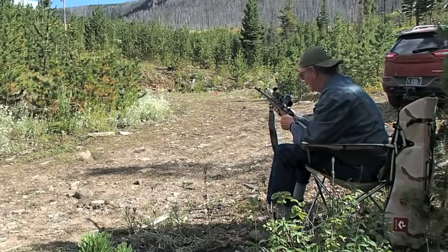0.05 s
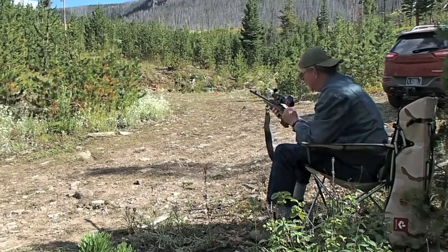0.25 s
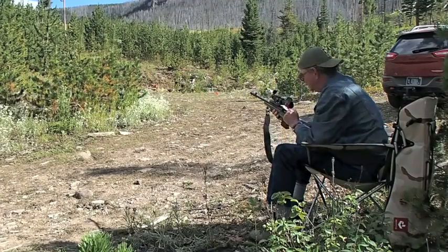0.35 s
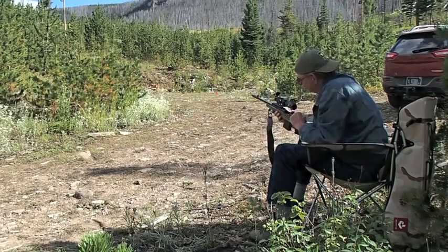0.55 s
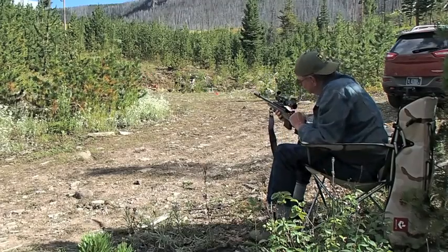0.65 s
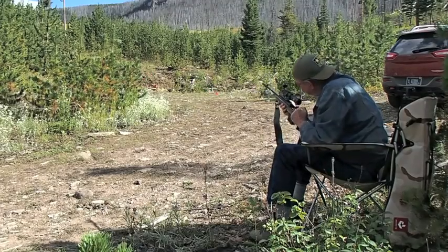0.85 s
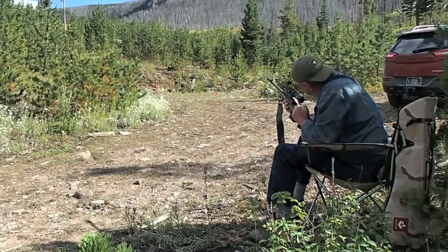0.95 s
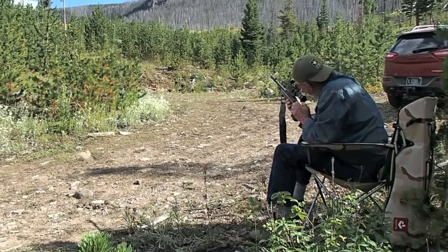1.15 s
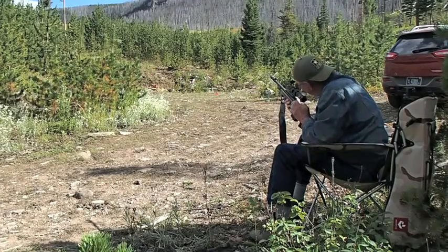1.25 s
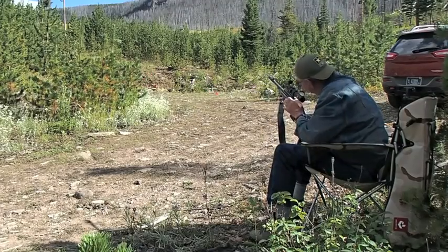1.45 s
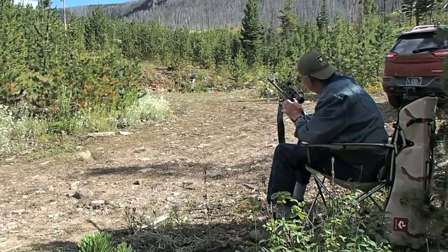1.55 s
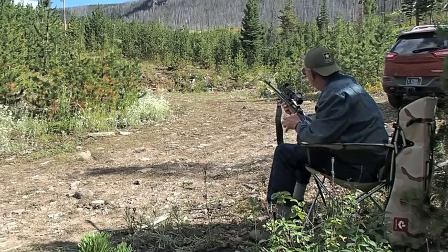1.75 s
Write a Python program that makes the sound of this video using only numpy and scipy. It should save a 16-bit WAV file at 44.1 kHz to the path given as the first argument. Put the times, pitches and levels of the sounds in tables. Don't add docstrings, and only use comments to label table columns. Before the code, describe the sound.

A rifle bolt is lifted and snapped back with hard steel clacks, the spent case rings and ticks on soil, then the bolt is pushed home and locked, a few metres from the microphone outdoors.

```python
import sys
import numpy as np
from scipy import signal
from scipy.io import wavfile
from scipy.ndimage import uniform_filter1d

SR = 44100
rng = np.random.default_rng(int(sys.argv[2]) if len(sys.argv) > 2 else 0)


def elevation(decibels):
    levels = np.asarray(decibels, float)
    return 10 ** (levels / 20)


def generate_wav(signal):
    frames = np.transpose(np.atleast_2d(signal))
    scaled = np.clip(frames, -1, 1) * 32767
    pcm = np.round(scaled).astype(np.int16)
    wavfile.write(sys.argv[1], SR, pcm)


N = 79380
PORT_HZ = 3990

# (frequency [Hz], density [dB per Hz])
AIR = [(24, -27), (40, -14), (65, -21), (119, -10), (500, -5.5), (880, 0.5), (3340, -8), (3920, -9.5),
       (5000, -14), (6500, -58), (11000, -120)]
# (frequency [Hz], density [dB per Hz])
HISS = [(2940, -27), (5000, -1), (9110, 1.5), (13800, -1.5), (15600, -7)]

# (time [s], peak [dB], chatter [ms], stock [dB], edge [dB])
OPENING = [(0.035, -42.5, 1.27, -38, -22), (0.1918, -33.5, 0.65, -4, -5), (0.1948, -20, 3, -17, -10),
           (.206, -16, 4.7, -22, -20), (0.2093, -4.5, 1.57, -48, -17.5), (0.2119, -15, 2.8, -39, -12.5),
           (0.2821, -30.5, 3.1, -11, -30), (0.3757, -29, 0.94, -7, -13.5), (.391, -38.5, 3, -6, -26),
           (0.4056, -14, 2.9, -41, -27), (0.407, -16, 1.6, -42, -19), (.4125, -17, 4, -16, -16),
           (0.4177, -6, 2.2, -21.5, -17), (0.4233, -14.5, 1.8, -39, -5.5), (0.4260, -2.5, 1.3, -32, -6),
           (0.43, -13.5, 2.8, -27, -11), (.433, -18.5, 3.5, -15, -5)]
# (time [s], peak [dB], chatter [ms], stock [dB], edge [dB])
CLOSING = [(0.7188, -42, 1.9, -11, -22), (1.3056, -23.5, 5, -26, -36), (1.319, -28, 2.1, -17, -33),
           (1.329, -20, 2.3, -9, -24), (1.3335, -17, 1.9, -11, -30), (1.3419, -33, 8.9, 3.5, -1),
           (1.3533, -17, 9, -17, -12), (1.356, -13, 1.7, -15, -25.5), (1.363, -21.5, 2.9, -25, -14),
           (1.369, -17.5, 1.5, -22, -18), (1.381, -30.5, 3.7, -12, -15), (1.391, -37, 3.4, -23, -31),
           (1.4057, -28, 2.9, -14, -21), (1.413, -6, 0.96, -46, -18), (1.4149, -10, 4.24, -40, -15.5),
           (1.569, -37.5, 3.6, -11, -22), (1.5985, -23.5, 1.9, -39, -26.5),
           (1.6005, -28.5, 9.3, -26.5, -15.5), (1.6353, -32.5, 9.1, -22, -22),
           (1.6481, -15, 1.7, -48, -15.5), (1.652, -17.5, 1.7, -42, -18), (1.7487, -41.5, 1.9, -15, -18.5)]
# (time [s], peak [dB], chatter [ms], stock [dB], edge [dB])
BOUNCES = [
    (0.9107, -30, 0.18, -8, 0),
    (0.9138, -32.5, 0.86, -5, -22),
    (0.9177, -33, 0.14, 0, -10),
    (.9215, -44.5, 0.31, -4, -4),
    (1.1847, -25.5, 0.13, -56, 9),
    (1.1867, -43, 2.7, -32, -20),
    (1.1898, -34, 0.43, -33, -21),
    (1.206, -41.5, 2.8, 2, -21),
    (1.239, -48, 1.7, -12, 7),
]
# (time [s], peak [dB], chatter [ms], stock [dB], pebble [dB])
SKID = [
    (1.1929, -28.5, 2.4, -39, 0),
    (1.198, -38.5, 3.6, -1, 6.5),
]

# (frequency [Hz], level [dB], t60 [s])
ACTION = [(1480, -11, 0.056), (1690, -1.5, 0.0087), (1850, 3, 0.015), (2347, 0, 0.0098),
          (2500, 10.5, 0.0091), (3200, -18, 0.0035), (3100, 2, 0.0098), (3740, 4.5, 0.013),
          (4030, -0.5, 0.027), (4290, 0, 0.05), (4430, -17.5, 0.014), (4750, -23, 0.0033),
          (5800, -14, 0.014), (5940, -9, 0.0099)]
# (frequency [Hz], level [dB], t60 [s])
STOCK = [(670, 6, 0.034), (960, 14, 0.0029), (1320, 21, 0.0085)]
# (frequency [Hz], level [dB], t60 [s])
EDGE = [(6900, 7, 0.0041), (7570, -1, 0.0078), (8740, 7, 0.0086), (10300, 14, 0.0016),
        (12400, 14.5, 0.0013), (14130, 9, 0.0055), (15800, -8.5, 0.0034)]
# (frequency [Hz], level [dB], t60 [s])
PEBBLE = [(5580, -5, 0.0098), (5600, -6, 0.015), (5740, -14, 0.007)]

# (frequency [Hz], width [Hz], level [dB])
LUGS = [(969, 135, -14.5), (1420, 68, -16.5), (1966, 42, -7.5), (2395, 200, -4), (3350, 185, 2.5),
        (4047, 110, 2), (4900, 120, -5.5), (5840, 120, -32)]
# (frequency [Hz], width [Hz], level [dB])
EXTRACTOR = [(651, 110, -40), (1400, 145, -14), (2460, 120, 0.5), (2950, 93, -8), (3600, 160, -8),
             (4000, 43, -9), (4260, 110, -5.5), (6140, 450, -17.5)]
# (frequency [Hz], width [Hz], level [dB])
EJECTOR = [(670, 160, -26), (1570, 210, -10), (3400, 230, -4.5), (4260, 340, -4), (4840, 240, -8),
           (5850, 210, -13)]
# (frequency [Hz], width [Hz], level [dB])
STOP = [(704, 75, -14.5), (1224, 34, -9.5), (1540, 130, -7), (2250, 270, -3.5), (3370, 130, 3.5),
        (3880, 190, -2), (4320, 200, 0.5), (5620, 120, -9.5), (6760, 390, -15.5), (7570, 170, -16)]
# (frequency [Hz], width [Hz], level [dB])
RAMP = [(1415, 18, -1.5), (1833, 140, 1.5), (2760, 73, 0.5), (2990, 28, -0.5), (3506, 71, -1),
        (4210, 37, -11), (4300, 140, -11.5), (5260, 63, -11), (5660, 210, -17.5)]
# (frequency [Hz], width [Hz], level [dB])
BREECH = [(740, 63, -13), (1800, 260, -3), (2323, 100, -6.5), (2610, 100, -9), (3080, 180, -3.5),
          (3835, 113, 1.5), (4040, 190, -2.5), (4690, 99, -3), (4950, 110, -25), (6170, 71, -11),
          (6800, 130, -15.5)]
# (frequency [Hz], width [Hz], level [dB])
LOCK = [(1380, 370, -2), (2367, 110, -0.5), (2670, 340, 1), (3520, 52, -1), (3480, 37, -21),
        (3960, 490, 0.5), (4730, 210, -11), (5200, 100, -27), (6180, 140, -9), (7340, 110, -11),
        (7640, 200, -11.5)]
# (start [s], end [s], modes of the part)
PARTS = [
    (.19, .22, LUGS),
    (.4, .416, EXTRACTOR),
    (.416, .42, EJECTOR),
    (.42, .44, STOP),
    (1.325, 1.375, RAMP),
    (1.41, 1.42, BREECH),
    (1.59, 1.66, LOCK),
]

# (time [s], level [dB])
SLIDE = [
    (1.292, -56.5),
    (1.3, -49),
    (1.32, -44),
    (1.345, -34),
    (1.372, -30.5),
    (1.378, -43),
    (1.405, -43),
    (1.415, -67),
]
# (time [s], level [dB])
DRAW = [
    (.215, -63),
    (.225, -45),
    (.27, -57),
    (.3, -62),
    (.35, -62),
    (.4, -56),
    (.415, -35),
    (.43, -60),
]

# (time [s], level [dB], frequency [Hz],
# t60 [s])
THUMPS = [
    (0.4239, -45.5, 268, 0.025),
    (0.912, -54, 275, 0.027),
    (1.6494, -24, 670, 0.026),
]
# (time [s], level [dB], t60 [s])
BRASS = [
    (.4325, -25, .16),
    (.4325, -27, .12),
    (.4335, -30, .15),
    (.4325, -41, .2),
    (.912, -35, .12),
    (1.1847, -21, .1),
    (1.1847, -37, .15),
    (1.1847, -42, .2),
    (1.3412, -40, .12),
    (1.382, -56, .05),
]
# (frequency [Hz], turn rate [1/s], starting turn [turns], depth [0-1])
TUMBLE = [(14555, 14, -.12, .97), (14435, 10, -.05, 1), (12830, 18, -.07, .52), (9950, 13.5, -.24, .95),
          (14500, 19, -.47, .56), (9862, 17, -.095, .96), (12800, 12.5, 0, .36), (14520, 26, -.04, .95),
          (12090, 19, -.12, .6), (12100, 20, 0, .5)]


def evened(x):
    return x / np.sqrt(np.mean(x ** 2) + 1e-20)


def read(points, hz):
    f, value = np.transpose(points)
    return np.interp(np.log(hz + 1), np.log(f + 1), value)


def background():
    air_db, hiss_db, patch_db = -57, -62, 3.6
    port_db, port_width_hz = 3.5, 260
    frames, hz = N // 256 + 5, np.fft.rfftfreq(1024, 1 / SR)
    a, b, c, d, patches = rng.standard_normal((frames, 513, 5)).T
    patches = uniform_filter1d(patches, 14, 0)
    patches = evened(uniform_filter1d(patches, 12, 1))
    port = 1 + elevation(port_db) / (1 + (2 * (hz - PORT_HZ) / port_width_hz) ** 2)
    fall_db = -12 * np.clip((hz - PORT_HZ) / 1200, 0, 3)
    air_shape = elevation(read(AIR, hz) + fall_db) * port
    hiss_shape = elevation(read(HISS, hz)) * hz ** 2 / (hz ** 2 + 1500 ** 2) * (hz < 15720)
    air_bins = (a + 1j * b) * air_shape[:, None] * elevation(patch_db * patches)
    hiss_bins = (c + 1j * d) * hiss_shape[:, None]
    both = np.array([air_bins, hiss_bins])
    air, hiss = signal.istft(both, nperseg=1024, noverlap=768)[1][:, :N]
    return elevation(air_db) * evened(air) + elevation(hiss_db) * evened(hiss)


def touches(size):
    touches_per_s, spread_db = 7000, 3
    draw = rng.random((size, 3))
    sign = np.sign(draw[:, 0] - .5)
    force = elevation(-spread_db * np.log(draw[:, 1] + 0.013))
    return sign * force * (draw[:, 2] < touches_per_s / SR)


def ring(modes, damp, tilt_db=0):
    spot_db, detune, pivot_hz = 2.5, 0.04, 2800
    hz, db, t60 = np.transpose(modes)[:, :, None]
    t = np.arange(2200) / SR
    spot = rng.standard_normal((len(modes), 3))
    swing = np.sign(spot[:, 2:]) * np.sin(2 * np.pi * hz * (1 + detune * spot[:, 1:2]) * t)
    level_db = db + tilt_db * np.log2(hz / pivot_hz) + spot_db * spot[:, :1]
    return (elevation(level_db - 60 * t / (t60 * damp)) * swing).sum(0)


def struck(push, part):
    spot_db, detune, damping_hz, rise_s = 0.77, 0.0031, 87, .0007
    hz, width, db = np.transpose(part)[:, :, None]
    t = np.arange(2200) / SR
    spot = rng.standard_normal((len(part), 3))
    width = width + damping_hz
    swing = np.sign(spot[:, 2:]) * np.sin(2 * np.pi * hz * (1 + detune * spot[:, 1:2]) * t)
    modes = np.exp(-np.pi * width * t) * np.minimum(t / rise_s, 1) * swing
    rung = signal.fftconvolve(push[None], modes, axes=1)
    share = rung / np.linalg.norm(rung, axis=1, keepdims=True)
    return (elevation(db + spot_db * spot[:, :1]) * np.sqrt(width) * share).sum(0)


def blow(s, peak_db, chatter_ms, stock_db, edge_db, damp=1, edges=EDGE):
    rise_ms = 0.24
    t = np.arange(1200) / SR
    push = touches(size=1200)
    push[3] = 1.78
    push = push * np.exp(-1000 * t / max(chatter_ms, .05)) * np.minimum(0.64 + 1000 * t / rise_ms, 1)
    part = [modes for start, end, modes in PARTS if start < s < end]
    if part:
        action = struck(push, part[0])
    else:
        tilt_db = 0.26 * (-5 - stock_db)
        action = np.convolve(push, ring(ACTION, damp, tilt_db))
    stock = np.convolve(push, ring(STOCK, damp))
    edge = np.convolve(push, ring(edges, damp))
    body = action / abs(action).max()
    body = body + elevation(stock_db) * stock / abs(stock).max()
    body = body + elevation(edge_db) * edge / abs(edge).max()
    return s, elevation(peak_db) * body


def clearing(x):
    t = np.arange(15000) / SR
    taps = rng.choice([-1., 1.], len(t)) * (rng.random(len(t)) < .05)
    trees = elevation(-60 * t / 0.34) * np.minimum(t / 0.0043, 1)
    slap, far = (np.exp(-((t - delay_s) / .004) ** 2) for delay_s in (.036, .076))
    tail = np.zeros(len(t))
    for db, shape in ((-19.5, trees), (-28, slap), (-42, far)):
        tail += elevation(db) * taps * shape / np.linalg.norm(taps * shape)
    band = signal.butter(2, (1650, 6200), "bandpass", fs=SR, output="sos")
    echo = signal.sosfilt(band, signal.fftconvolve(x, tail)[:N])
    return echo + elevation(-18.5) * signal.lfilter(*signal.iirpeak(PORT_HZ, 5.5, SR), echo)


def travel(curve):
    s, db = np.transpose(curve)
    push = touches(size=N)
    scrape = np.zeros(N)
    for modes, tilt_db, level_db in ((ACTION, -3, -.1), (STOCK, 0, -14), (EDGE, 0, -20)):
        rung = signal.oaconvolve(push, ring(modes, 0.49, tilt_db))[:N]
        scrape += elevation(level_db) * evened(rung)
    return elevation(np.interp(np.arange(N) / SR, s, db, -200, -200)) * scrape


def thump(s, db, hz, t60):
    t = np.arange(2000) / SR
    return s, elevation(db - 60 * t / t60) * np.minimum(t / 0.0013, 1) * np.sin(2 * np.pi * hz * t)


def brass(s, db, t60, hz, turns, start, depth):
    wobble_hz, wobble_per_s, edge_on = 14, 21, .2
    t = np.arange(9000) / SR
    drift = wobble_hz * np.sin(2 * np.pi * (wobble_per_s * t + rng.random()))
    facing = np.hypot(1 - depth * (1 - np.cos(2 * np.pi * (turns * t + start))), edge_on)
    envelope = np.sqrt(2) * elevation(db - 60 * t / t60) * facing * np.minimum(t / 0.00071, 1)
    return s, envelope * np.sin(2 * np.pi * np.cumsum(hz + drift) / SR)


def band_limited(x):
    low = signal.butter(6, 570, "highpass", fs=SR, output="sos")
    top = signal.butter(14, 15750, fs=SR, output="sos")
    leak = elevation(-24) * signal.lfilter(*signal.butter(2, 158, "highpass", fs=SR), x)
    return signal.sosfilt(top, signal.sosfilt(low, x) + leak)


def add(mix, s, sound):
    part = mix[round(s * SR):][:len(sound)]
    part += sound[:len(part)]


def scene():
    rifle, case = travel(SLIDE) + travel(DRAW), np.zeros(N)
    for row in OPENING + CLOSING:
        add(rifle, *blow(*row))
    for row in BOUNCES:
        add(rifle, *blow(*row, damp=0.34))
    for row in SKID:
        add(rifle, *blow(*row, damp=0.72, edges=PEBBLE))
    for row in THUMPS:
        add(case, *thump(*row))
    for row, turn in zip(BRASS, TUMBLE):
        add(case, *brass(*row, *turn))
    return (band_limited(rifle + clearing(rifle)) + case + background())[None]


def low_pass(x):
    return signal.sosfilt(signal.butter(12, 16810, fs=SR, output="sos"), x)


def record(dry):
    ceiling, knee, offset = .97, 14, -.0006
    limited = dry / (1 + abs(dry / ceiling) ** knee) ** (1 / knee)
    return low_pass(limited + offset)


dry = scene()
out = record(dry)
generate_wav(out)
```